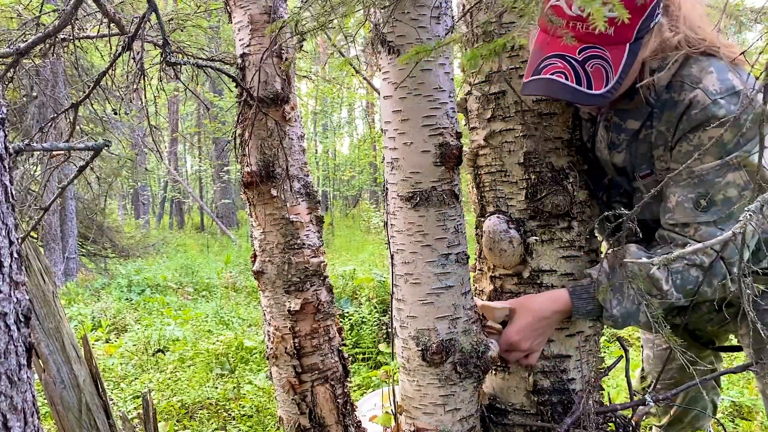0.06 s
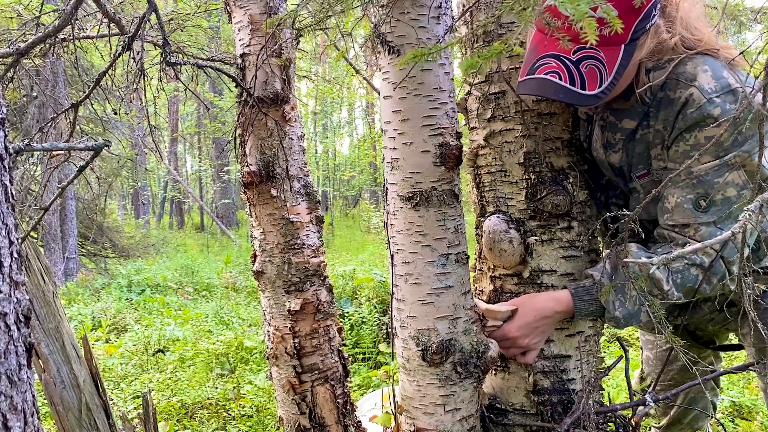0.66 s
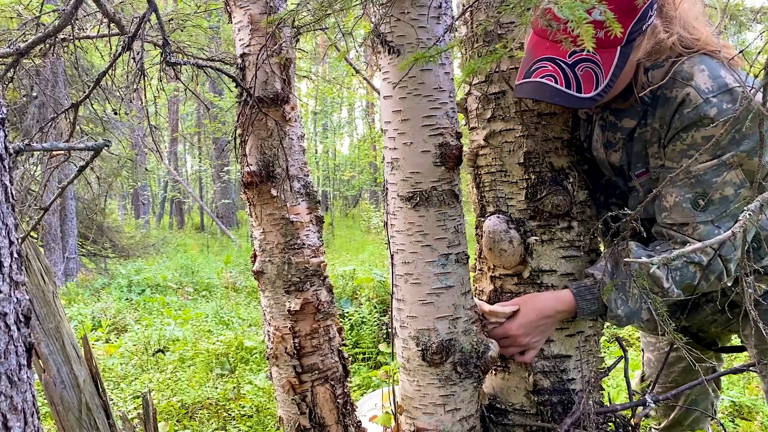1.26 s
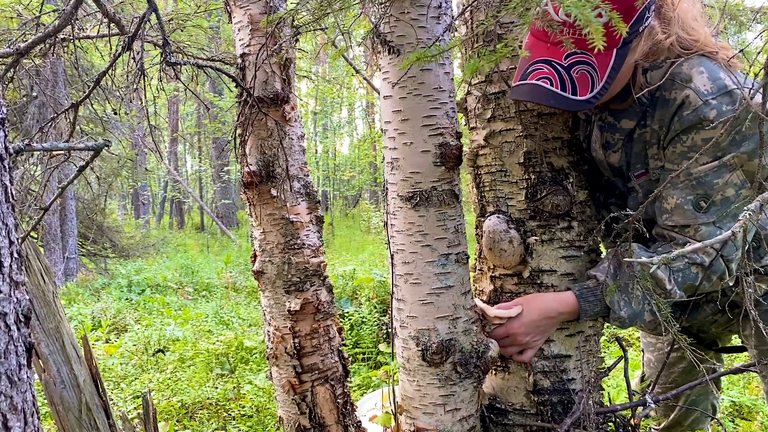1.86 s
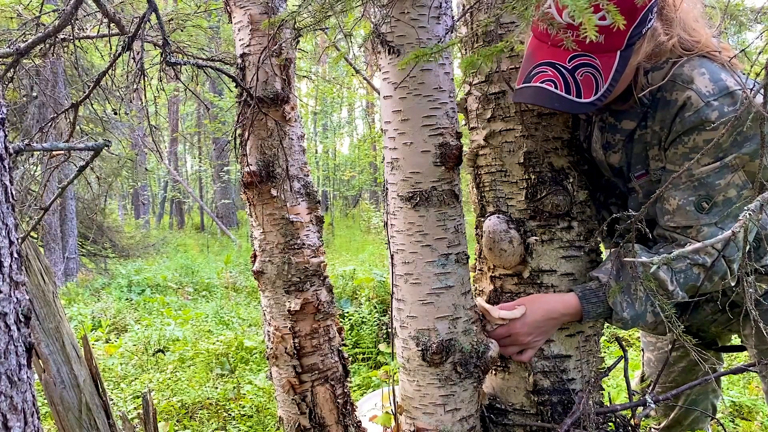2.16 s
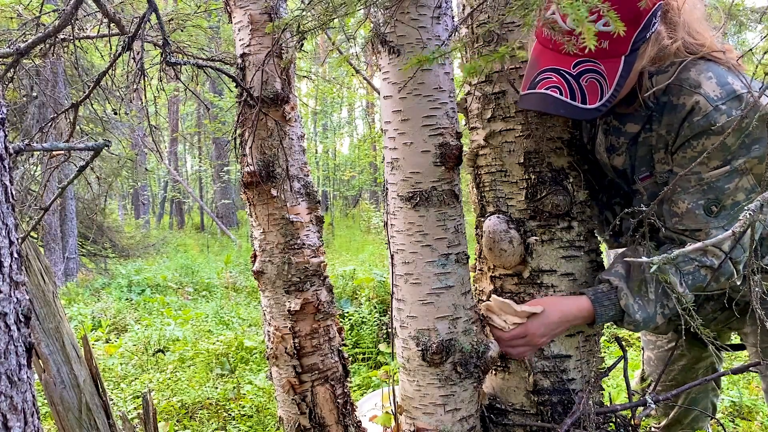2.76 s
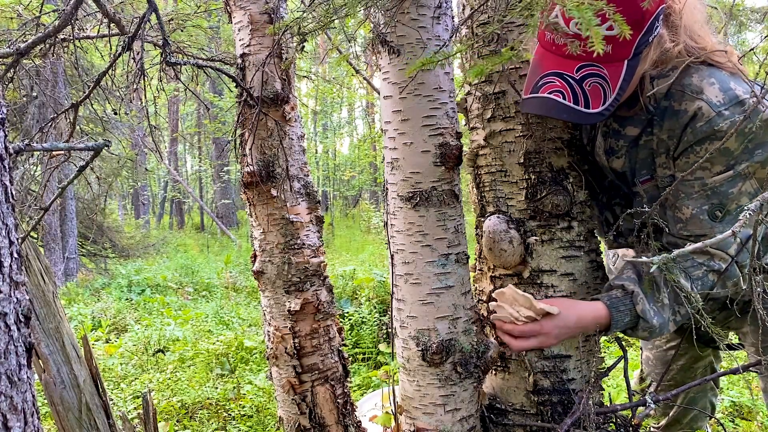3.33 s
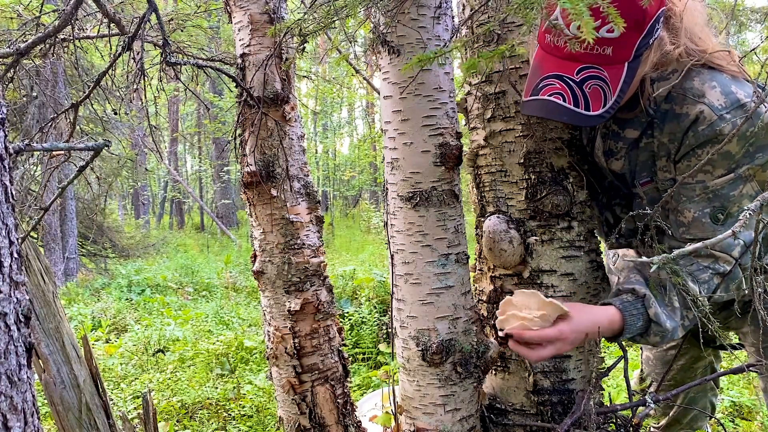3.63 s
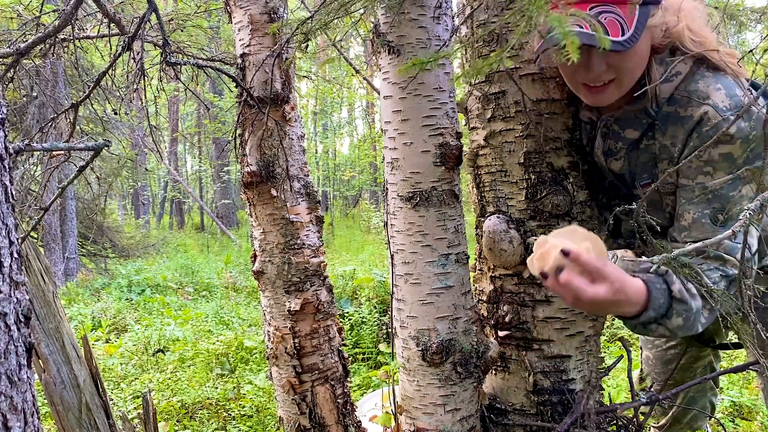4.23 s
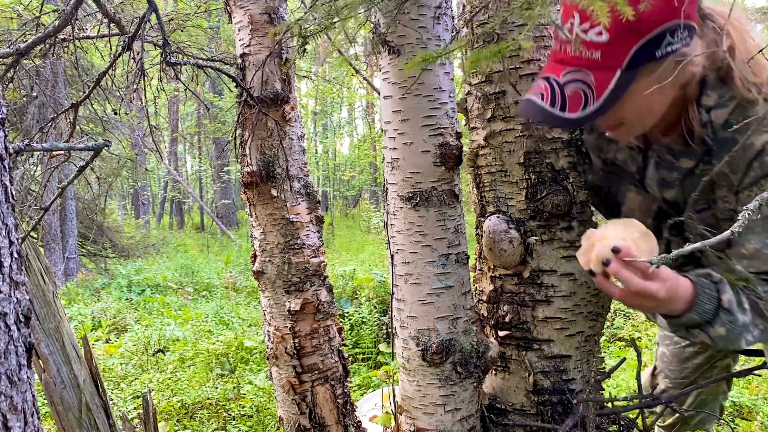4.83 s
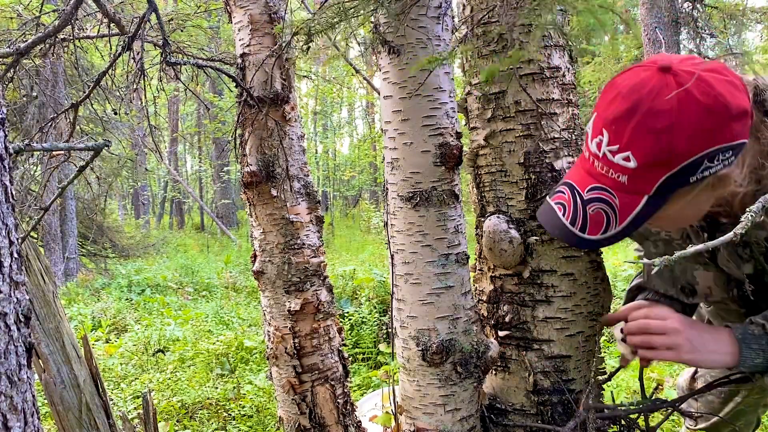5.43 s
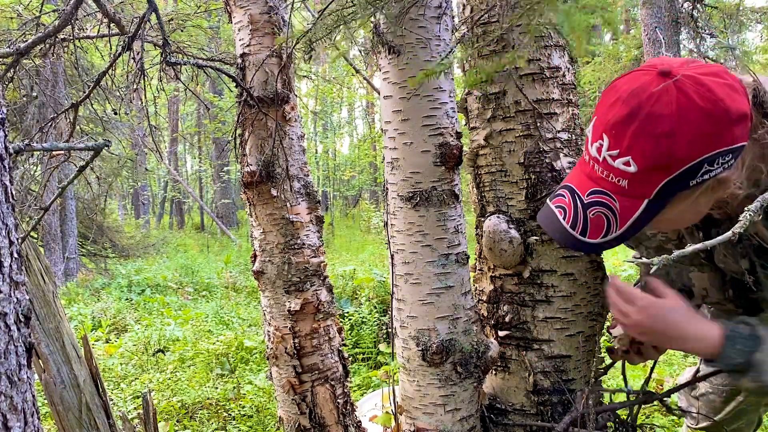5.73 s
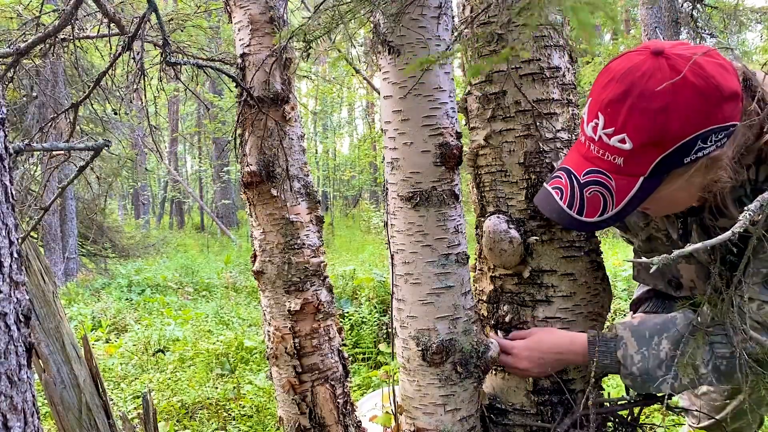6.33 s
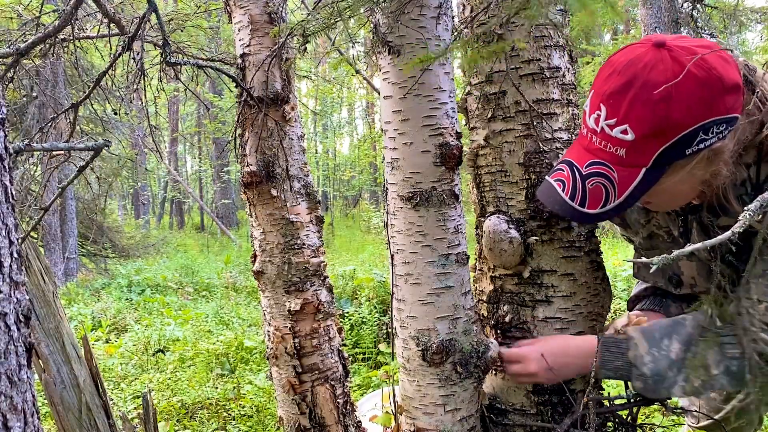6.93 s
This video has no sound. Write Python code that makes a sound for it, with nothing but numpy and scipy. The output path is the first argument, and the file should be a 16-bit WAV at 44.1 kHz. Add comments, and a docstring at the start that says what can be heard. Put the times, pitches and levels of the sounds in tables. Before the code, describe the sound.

Small cracks, ticks and sleeve rustling from hand-picking a mushroom off a tree, with one sharp twig snap in a quiet forest.

```python
"""Bark and mushroom stalks crack as a picker in a padded jacket works a cluster off a tree trunk,
a couple of metres from a phone microphone in a still forest. Each crack is a quick train of slips
that sets the freed piece ringing. Crumbs tick, sleeves and undergrowth rustle, and a dry branch snaps
and splinters as the picker crouches. Nearby trunks scatter every crack; distant trees hush behind."""
import sys
import numpy as np
from scipy import signal
from scipy.fft import rfft, irfft
from scipy.io import wavfile
from scipy.ndimage import uniform_filter1d

SR = 44100
rng = np.random.default_rng(int(sys.argv[2]) if len(sys.argv) > 2 else 0)


def int16_out(signal):
    """Quantize to a 16-bit WAV file."""
    q = np.round(np.clip(np.atleast_2d(signal).T, -1, 1) * 32767)
    wavfile.write(sys.argv[1], SR, q.astype(np.int16))


N = 317079
T = np.arange(N) / SR
HIT_T = T[:int(.05 * SR)]  # time within one crack or tick

# dull knock of a piece breaking free: (frequency [Hz], level [dB])
KNOCK_SPECTRUM = [(40, -60), (250, -26), (450, 3.5), (700, -8), (1200, 2), (1900, 0), (3000, -3.5),
                  (8000, -34.5)]
# body of a crack in wood: (frequency [Hz], level [dB])
WOOD_SPECTRUM = [(40, -40), (300, -2.5), (900, -21.5), (2000, -1), (3600, 4), (5000, 1), (6800, -4),
                 (9000, -8), (16000, -74)]
# crisp top of cracks, ticks and rustle: (frequency [Hz], level [dB])
CRISP_SPECTRUM = [(200, -68), (1200, -8), (4500, -22), (6500, -5), (8500, -2), (10000, 0), (11000, 3),
                  (12100, 5), (13500, 2.5), (15500, -11)]


def cracks(ring_t60_at_1khz=0.011, after_db=-13, after_s=0.0026, bright_width_hz=1700, bright_db=-3):
    """A fracture runs as a quick train of slips, then the freed piece rings at its own two pitches."""
    # breaks of bark, stalk and twig: (time [s], fracture run [s], low ring [Hz], bright ring [Hz],
    # knock level [dB], crack level [dB], crisp level [dB])
    breaks = [(0.048, 0.0027, 910, 4400, -60, -54, -49), (0.0803, 0.0012, 2130, 3380, -47, -43, -46.5),
              (0.531, 0.0032, 1210, 5900, -49, -46.5, -46), (0.6242, 0.0005, 820, 3560, -45.5, -47, -59),
              (0.72, 0.00021, 794, 6030, -48.5, -43.5, -50.5),
              (0.8775, 0.0037, 1650, 3930, -59, -46.5, -47),
              (0.9318, 0.00079, 1130, 3550, -43.5, -37.5, -41.5),
              (0.9406, 0.00068, 574, 5000, -45.5, -58, -50), (0.991, 0.0017, 1700, 3600, -56, -76, -59),
              (1.0468, 0.0012, 2060, 3800, -59, -50, -45.5), (1.221, 0.0011, 1430, 3200, -57, -67, -73),
              (1.719, 0.00025, 2900, 7760, -74, -43, -43), (1.883, 0.0033, 1570, 4700, -55.5, -51, -48),
              (2.0169, 0.00036, 1190, 7400, -44, -43, -41),
              (2.1148, 0.00062, 1340, 2720, -42.5, -50.5, -57),
              (2.567, 0.00045, 2130, 5740, -42, -35, -36.5),
              (2.7755, 0.00034, 1730, 7250, -71, -37.5, -33.5), (3.04, 0.0009, 1890, 3980, -59, -50.5, -54),
              (3.1046, 0.00041, 630, 4200, -73, -54.5, -49.5), (3.15, 0.0011, 700, 2380, -40, -38.5, -32),
              (3.1512, 0.00079, 1150, 2400, -39.5, -50, -28), (4.726, 0.0011, 620, 4100, -69, -53, -46),
              (4.8332, 0.0011, 790, 4020, -68, -48, -46), (4.8437, 0.0034, 2010, 3620, -52, -46, -47),
              (4.855, 0.0003, 1290, 3600, -67, -47, -52), (4.9558, 0.0007, 1400, 4000, -65, -49.5, -49),
              (5.2255, 0.0011, 695, 3600, -56, -49.5, -49), (5.4299, 0.0094, 1600, 3220, -55, -50, -40),
              (5.6115, 0.0017, 1500, 5900, -62, -51, -47), (5.658, 0.0013, 2170, 5600, -30, -19, -13.5),
              (5.9182, 0.0021, 1540, 4730, -37.5, -31, -23.5), (5.921, 0.0014, 620, 2300, -30.5, -63, -36),
              (5.9884, 0.0014, 1160, 3280, -50.5, -51, -52), (6.1123, 0.0034, 960, 6600, -79, -45.5, -49),
              (6.1555, 0.0016, 645, 5760, -57, -44, -41), (6.2498, 0.0022, 970, 4430, -59, -47.5, -39.5),
              (6.262, 0.0013, 2010, 6260, -76, -46.5, -44), (6.6935, 0.0026, 1600, 3620, -54, -49, -60),
              (6.7756, 0.00052, 620, 2600, -77, -54, -46), (6.919, 0.0025, 1650, 7200, -55, -47, -57)]
    out = np.zeros(N)
    for start, run_s, ring_hz, bright_hz, knock_db, crack_db, crisp_db in breaks:
        progress = HIT_T / run_s
        tearing = np.exp(-(progress / 1.19) ** 2) + undb(after_db) * np.exp(-HIT_T / after_s)
        onset = 1 - np.exp(-progress / 0.31)
        slips = rng.standard_normal(len(HIT_T)) * tearing * onset
        # the ring builds while the fracture runs, and lower pieces ring longer
        fade = np.exp(-np.log(1000) * HIT_T / ring_t60_at_1khz * np.sqrt(ring_hz / 1000))
        # it starts sharp and sags as the piece comes loose
        cycles = np.cumsum(ring_hz * (0.936 + 0.22 * np.exp(-HIT_T / 0.002))) / SR
        ring = np.sin(2 * np.pi * cycles) * (1 - np.exp(-progress)) * fade
        knock = unit_hit(colour(slips, KNOCK_SPECTRUM)) + unit_hit(ring)
        wood = colour(slips, WOOD_SPECTRUM)
        crack = unit_hit(wood) + undb(bright_db) * unit_hit(resonance(wood, bright_hz, bright_width_hz))
        add(out, start, undb(knock_db) * unit_hit(knock))
        add(out, start, undb(crack_db) * unit_hit(crack))
        add(out, start, undb(crisp_db) * unit_hit(colour(slips, CRISP_SPECTRUM)))
    return out


def splinters(snap_s=5.658, jolt_db=-35.5):
    """The snapped branch gives a dull jolt and lets go fibre by fibre, in fading bursts."""
    # fibres giving way: (time [s], level [dB], fade time [s], crisp top relative to the wood [dB])
    bursts = [(5.6605, -18, 0.0037, 10), (5.669, -26.5, 0.013, 1.5), (5.675, -21, 0.0034, -5),
              (5.679, -29, 0.021, 5)]
    # the whole branch jolting: (frequency [Hz], level [dB])
    jolt_spectrum = [(30, 2), (100, 13), (250, -22), (500, 9), (900, 1), (3000, -38)]
    out = np.zeros(N)
    t = T[:SR // 5]
    jolt = colour(rng.standard_normal(len(t)) * np.exp(-t / 0.0014), jolt_spectrum)
    add(out, snap_s, undb(jolt_db) * unit_hit(jolt))
    for start, db, fade_s, crisp_db in bursts:
        fibres = grains(len(t), per_s=4100, spread_db=3.0)
        wood = unit(colour(fibres, WOOD_SPECTRUM)) + unit(colour(fibres, KNOCK_SPECTRUM))
        burst = unit(wood + undb(crisp_db) * unit(colour(fibres, CRISP_SPECTRUM)))
        add(out, start, undb(db) * burst * np.exp(-t / fade_s))
    return out


def flakes(rub_gain, count=200, quiet_db=-65, follow=0.51, spread_db=2.5, crisp_db=-9):
    """Bark crumbs and dry needles tick at random, each at its own pitch, louder as the rubbing grows."""
    shortest_fade_s, longest_fade_s = 0.00061, 0.0025
    out = np.zeros(N)
    effort_db = 20 * np.log10(rub_gain / np.percentile(rub_gain, 10))
    for when, size, pitch, length in rng.random((count, 4)):
        i = int(when * N)
        fade_s = np.interp(length, [0, 1], [shortest_fade_s, longest_fade_s])
        slip = rng.standard_normal(len(HIT_T)) * np.exp(-HIT_T / fade_s)
        ring = resonance(slip, hz=2000 + 11000 * np.sqrt(pitch), width_hz=2400)
        tick = unit_hit(ring) + undb(crisp_db) * unit_hit(colour(slip, CRISP_SPECTRUM))
        size_db = spread_db * min(-np.log(1 - size), 3)
        add(out, T[i], undb(quiet_db + follow * effort_db[i] + size_db) * unit_hit(tick))
    return out


def motion_db():
    """The picker keeps nearly still at the trunk, then lifts the cluster and crouches."""
    # amount of movement: (time [s], level [dB])
    movement = [(0, -64), (0.7, -64), (1.25, -71.5), (2.1, -65.5), (2.9, -66), (3.7, -68), (4.2, -58.5),
                (4.44, -64), (4.7, -55.5), (5.1, -51), (5.52, -59), (5.8, -51.5), (6.05, -58), (6.7, -61.5),
                (7.19, -55.5)]
    return np.interp(T, *np.transpose(movement))


def rubbing(slide_body_db=1, attack_share=0.23, release_s=0.015):
    """Gains of the rustle's body and crisp top: cloth slides, and each stroke swells, holds and fades."""
    # hand and sleeve over bark and leaves: (start [s], length [s], body level [dB], crisp level [dB])
    strokes = [(0.01, 0.12, -64, -56.5), (0.35, 0.14, -64, -66), (1.064, 0.043, -60.5, -60.5),
               (2.345, 0.089, -60, -65.5), (2.525, 0.14, -55.5, -53.5), (2.651, 0.096, -48, -47),
               (3.027, 0.066, -64, -60), (3.876, 0.16, -59, -55.5), (4.08, 0.22, -59, -65),
               (4.255, 0.12, -57, -51), (4.626, 0.033, -47, -48), (4.929, 0.15, -49.5, -45.5),
               (5.089, 0.14, -50, -49), (5.424, 0.03, -49.5, -46), (5.564, 0.017, -51, -56),
               (5.734, 0.22, -53.5, -52.5), (6.098, 0.019, -58, -45), (6.099, 0.056, -58, -44.5),
               (6.167, 0.05, -61, -49), (6.247, 0.15, -58, -53), (6.48, 0.17, -56, -53.5),
               (6.737, 0.19, -56.5, -50), (7.038, 0.13, -62, -53)]
    slide_db = motion_db()
    power = undb([slide_db + slide_body_db, slide_db]) ** 2
    for start, length, body_db, crisp_db in strokes:
        swell = np.clip((T - start) / (attack_share * length), 0, 1)
        fade = np.exp(-np.clip(T - start - length, 0, 1) / release_s)
        power += (undb([[body_db], [crisp_db]]) * swell * fade) ** 2
    return np.sqrt(power)


def rustle(body_gain, crisp_gain, catch_db=-3.0, catch_s=0.00096, jerk_db=1.3, grip_db=0.7):
    """Cloth and leaves slide with a fine hiss and catch in small ticks, jerkily and with varying grip."""
    # body of the rubbing: (frequency [Hz], level [dB])
    rub_spectrum = [(300, -20), (900, -0.5), (1700, 1), (2600, 1), (3600, 3), (4900, 1), (6000, -4.5),
                    (8000, -30), (16000, -53)]
    catches = np.abs(grains(N, per_s=180, spread_db=3.0))
    catch_envelope = signal.lfilter([1], [1, -np.exp(-1 / (catch_s * SR))], catches)
    hiss = grains(N, per_s=9000, spread_db=1.5)
    crackle = undb(catch_db) * unit(catch_envelope * rng.standard_normal(N))
    slips = (hiss + crackle) * undb(jerk_db * walk(110) + grip_db * walk(25))
    body = folds(colour(slips, rub_spectrum), centres_hz=[1740, 2430, 3700, 5730])
    crisp = folds(colour(slips, CRISP_SPECTRUM), centres_hz=[6800, 9500, 13000])
    return body * body_gain + crisp * crisp_gain


def folds(x, centres_hz, share_db=-6, wander_db=4):
    """Folds and leaves of different sizes take turns, so the colour keeps shifting."""
    rings = sum(unit(resonance(x, hz, hz / 4)) * undb(wander_db * walk(45)) for hz in centres_hz)
    return unit(unit(x) + undb(share_db) * unit(rings))


def scrapes():
    """Mushroom flesh, sleeve and boot drag briefly, sticking and slipping around one pitch."""
    # short, hollow drags: (centre time [s], level [dB], half length [s], pitch [Hz])
    drags = [(2.639, -50, 0.033, 605), (4.189, -52.5, 0.017, 3220), (5.039, -49, 0.036, 1600),
             (5.179, -42, 0.011, 2250), (5.219, -44, 0.0054, 610), (5.408, -54, 0.12, 860)]
    out = np.zeros(N)
    t = T[:SR // 4] - 1 / 8
    for centre_s, db, half_s, hz in drags:
        slips = grains(len(t), per_s=1400, spread_db=-1.5)
        hollow = resonance(resonance(slips, hz, width_hz=hz), hz, width_hz=hz)
        add(out, centre_s + t[0], undb(db) * unit(hollow) * np.exp(-(t / half_s) ** 2))
    return out


def jacket(relative_db=-3.5, flutter_db=1):
    """Heavy folds of the jacket give way with muffled bumps as the picker moves."""
    # padded cloth: (frequency [Hz], level [dB])
    cloth_spectrum = [(30, -33), (100, -11.5), (250, -0.5), (480, 0), (800, -4.5), (1200, -8), (2500, -39),
                      (8000, -58)]
    bumps = unit(colour(grains(N, per_s=1500, spread_db=3.5), cloth_spectrum))
    return bumps * undb(motion_db() + relative_db + flutter_db * walk(45))


def thuds(half_s=0.042, hz=85, width_hz=80):
    """Moss and soil give under a boot with a faint, low swell."""
    # the picker's weight shifting on soft ground: (time [s], level [dB])
    weight_shifts = [(0.72, -60), (4.06, -72), (5.76, -56)]
    ground = resonance(resonance(rng.standard_normal(N), hz, width_hz), hz, width_hz)
    swells = sum(undb(db) * np.exp(-((T - centre_s) / half_s) ** 2) for centre_s, db in weight_shifts)
    return unit(ground) * swells


def trunks(x, near_db=-12, near_s=0.0078, far_db=-29, far_t60=0.69):
    """Close trunks and the ground scatter sound to the microphone; the wood behind adds a faint tail."""
    t = T[:SR]
    near = grains(len(t), per_s=2300, spread_db=3.5) * np.exp(-t / near_s) * (t > .0012)
    far = colour(rng.standard_normal(len(t)), [(200, 5), (4000, -1), (14000, -2)])
    far = far * np.exp(-np.log(1000) * t / far_t60) * (t > .015)
    echo = undb(near_db) * near / np.linalg.norm(near) + undb(far_db) * far / np.linalg.norm(far)
    return x + signal.fftconvolve(x, echo)[:N]


def forest(level_db=-58, wander_db=0.51):
    """Faint, even hush of trees far from the microphone."""
    # distant trees: (frequency [Hz], level [dB])
    hush_spectrum = [(20, -16), (40, -16.5), (65, -3.5), (150, -3), (400, -0.5), (620, -4), (1000, -8.5),
                     (1500, -10.5), (2400, -13.5), (3500, -12.5), (7000, -18.5), (9500, -21), (12200, -24),
                     (15500, -43)]
    hush = unit(colour(rng.standard_normal(N), hush_spectrum))
    return hush * undb(level_db + wander_db * walk(2.3))


def grains(count, per_s, spread_db):
    """Tiny slips at random moments, most of similar size, a few far from it."""
    fires = rng.random(count) < per_s / SR
    sizes = undb(spread_db * np.minimum(rng.exponential(size=count), 5))
    return unit(fires * sizes * rng.choice([-1, 1], count))


def walk(rate_hz):
    """Smooth random wander with an rms of 1."""
    hold = max(int(SR / rate_hz), 2)
    steps = np.repeat(rng.standard_normal(N // hold + 1), hold)
    return unit(uniform_filter1d(uniform_filter1d(steps, hold), hold)[:N])


def colour(x, spectrum, size=2048):
    """Causal filter with a spectrum of (frequency [Hz], level [dB]), built from its cepstrum."""
    hz, db = np.transpose(spectrum)
    bins_hz = np.maximum(np.fft.rfftfreq(size, 1 / SR), 1)
    gains = undb(np.interp(np.log(bins_hz), np.log(hz), db))
    cepstrum = irfft(np.log(gains))
    cepstrum[1:size // 2] *= 2
    cepstrum[size // 2 + 1:] = 0
    impulse = irfft(np.exp(rfft(cepstrum)))
    return signal.fftconvolve(x, impulse)[:len(x)]


def resonance(x, hz, width_hz):
    """Two-pole band-pass."""
    return signal.lfilter(*signal.iirpeak(hz, hz / width_hz, fs=SR), x)


def undb(db):
    """Decibels to gain."""
    return 10 ** (np.asarray(db) / 20)


def unit(x):
    """Scale to an rms of 1."""
    return x / np.sqrt(np.mean(x ** 2))


def unit_hit(x):
    """Scale a short sound to the energy of 10 ms at an rms of 1."""
    return x / np.sqrt(np.sum(x ** 2) / (.01 * SR))


def add(out, start_s, sound):
    """Mix a sound in at its start time."""
    i = max(int(start_s * SR), 0)
    out[i:i + len(sound)] += sound[:N - i]


def scene():
    """Sharp sounds scatter off the trunks; rubbing and the forest hush fill in between, all in mono."""
    body_gain, crisp_gain = rubbing()
    breaking = trunks(cracks() + splinters() + flakes(crisp_gain))
    picker = rustle(body_gain, crisp_gain) + scrapes() + jacket() + thuds()
    return (breaking + picker + forest())[None]


def record(dry, top_hz=15800):
    """The phone, a couple of metres off, clips any peak beyond full scale and cuts the top."""
    low_pass = signal.ellip(8, .2, 70, top_hz, fs=SR, output="sos")
    return signal.sosfilt(low_pass, np.clip(dry, -1, 1))


dry = scene()
out = record(dry)
int16_out(out)
```